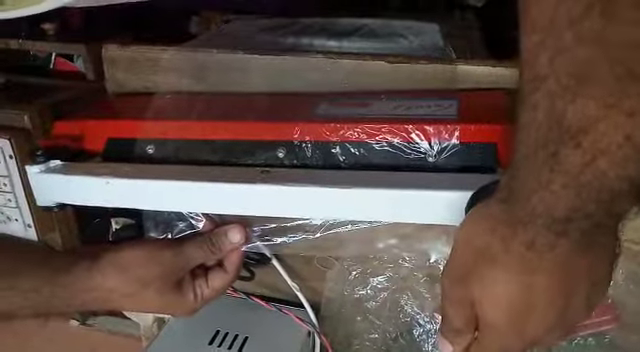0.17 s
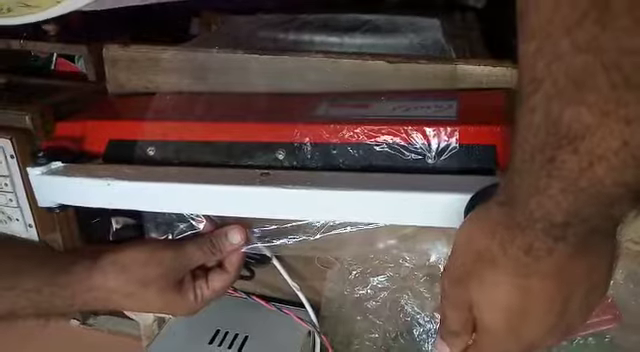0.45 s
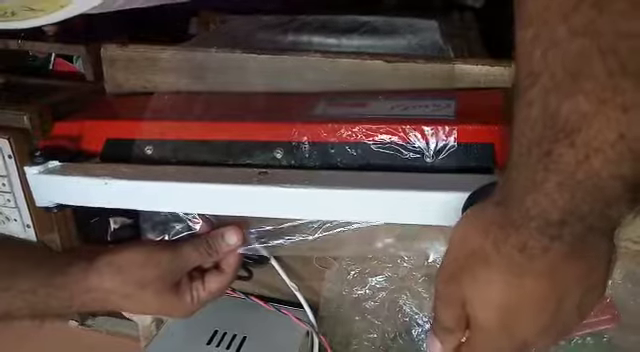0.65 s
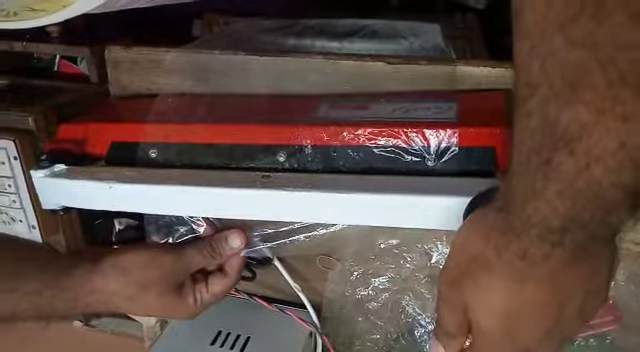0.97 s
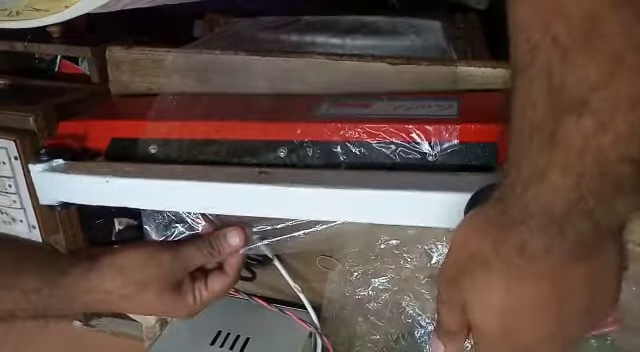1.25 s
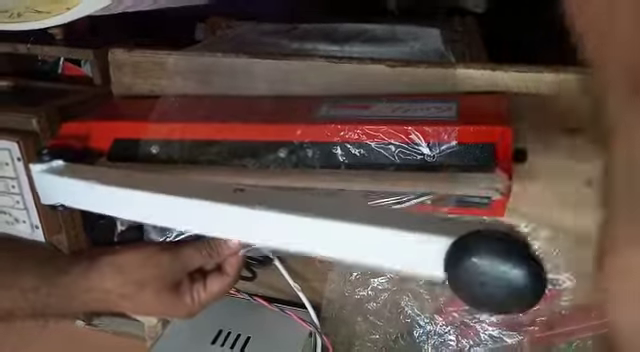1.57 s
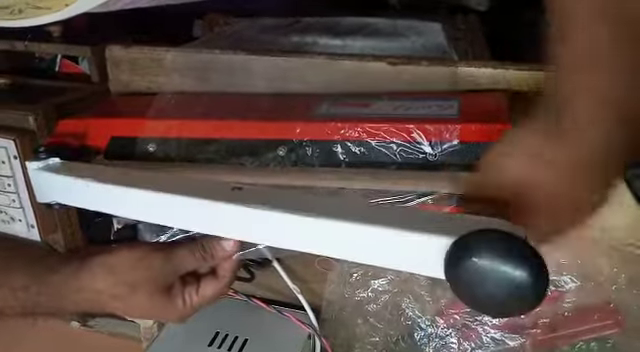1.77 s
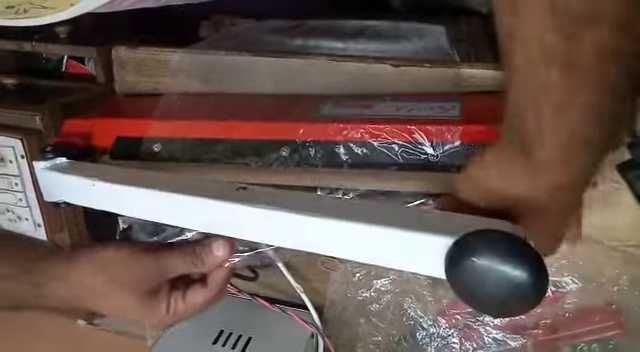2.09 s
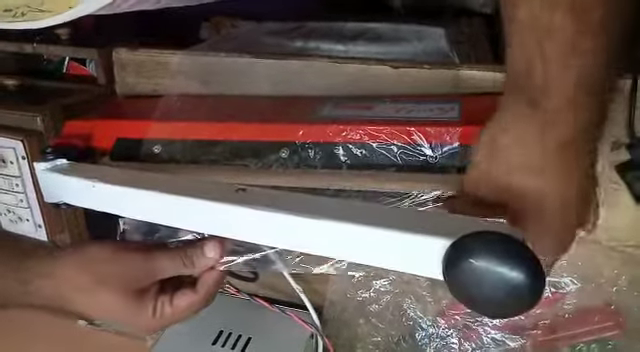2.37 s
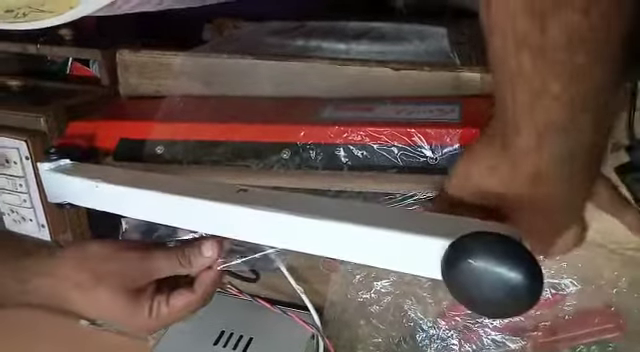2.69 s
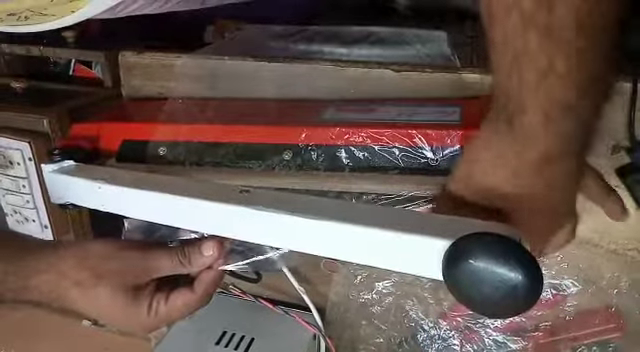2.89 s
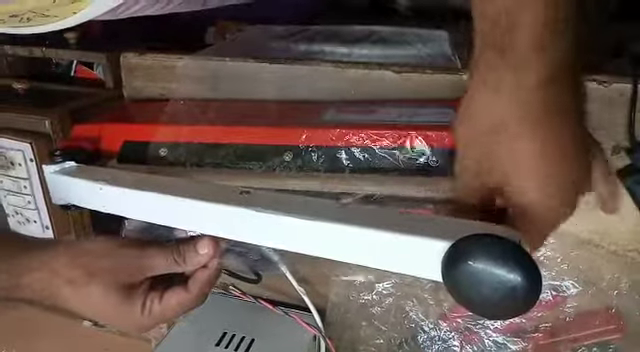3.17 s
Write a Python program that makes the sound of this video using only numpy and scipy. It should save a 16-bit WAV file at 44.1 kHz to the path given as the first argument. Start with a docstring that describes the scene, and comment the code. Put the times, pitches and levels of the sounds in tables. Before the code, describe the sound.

A hand-operated plastic sealer clacks down at about 0.1 seconds with a soft bench thud. Its hinge ticks at 1 second, a bright ringing click follows at 1.3, and the arm rattles against its stop around 1.5 with a short spring twang. Plastic film then crackles faintly, with a light tap at 2.9 and more rustling and soft thuds near 3.2. A fan hums steadily throughout in the small room.

```python
"""Impulse sealer on a workbench

A small room, one small microphone above a cramped bench; a motor, probably a fan, hums throughout.
The hand lever clacks down on plastic film and is held. The grip eases, the hinge slips, the switch
snaps open, and the arm springs up and rattles against its stop, shaking its spring. The film is drawn
away, crackling and rustling, with a tap of the hand on the machine and soft thuds from the bench."""
import sys
import numpy as np
from scipy import signal
from scipy.fft import rfft, irfft, next_fast_len
from scipy.io import wavfile
from scipy.ndimage import map_coordinates

SR = 44100
rng = np.random.default_rng(int(sys.argv[2]) if len(sys.argv) > 2 else 0)


def dump(signal):
    """Clip the signal to [-1, 1] and save it as 16-bit WAV at the path in sys.argv[1]."""
    limited = np.clip(np.atleast_2d(signal).T, -1, 1)
    pcm = np.round(limited * 32767).astype(np.int16)
    wavfile.write(sys.argv[1], SR, pcm)


N = 147294

# blows on each part of the sealer
# (time [s], level [dB], contact length [s], tilt [dB/octave], ringing [dB], favoured pitch [Hz])
LEVER_BLOWS = [(.058, -43, .009, -2, -6, 1800), (.1142, -27, .008, 0, 1, 1100),
               (.2368, -37.5, 0.0036, 1, -1.5, 2580), (.288, -43, 0.0094, -3.5, -0.5, 2590)]
HINGE_BLOWS = [(1.0262, -28.5, 0.0089, -1.5, 4, 1700)]
SWITCH_BLOWS = [(1.3098, -24, 0.012, -2.5, 6, 2600)]
ARM_BLOWS = [(1.5188, -24.5, 0.011, -4, 3, 2000), (1.5875, -36.5, 0.0087, -2, 3, 3400),
             (1.637, -33, 0.0073, -3, 6.5, 2200)]
# resonances of the struck parts (frequency [Hz], level [dB], t60 [s])
BASE_MODES = [(498, 2, 0.12), (955, -9, 0.23), (1242, -7, .2), (1384, -8, .22), (1631, -8, 0.14),
              (1876, -4, 0.23), (2580, -0.5, 0.12), (3910, -6.5, 0.12), (4150, -12, 0.13), (6250, -6, .14)]
HINGE_MODES = [(697, -3, .06), (1596, -1, 0.06), (1826, -5, .05), (2200, -2, 0.051), (6700, -10, .03)]
SWITCH_MODES = [(529, 1.5, 0.22), (823, -15, .2), (1085, -11.5, 0.32), (1580, -12, .14), (1860, -16, .12),
                (2625, -8.5, 0.073), (4180, -13, .08), (4650, -0.5, 0.048), (6170, -5, 0.068),
                (7800, -1, 0.076)]
ARM_MODES = [(450, 0, .17), (531, 1, 0.082), (633, -0.5, 0.21), (1835, -8, 0.11), (2098, 1.5, 0.068),
             (2195, -1, 0.066), (3040, -7, 0.045), (3320, -19, 0.15), (3815, -9, .04), (4200, -9, .04),
             (6630, -24, 0.14)]
# spectra of rushing air and of contact noises (frequency [Hz], level [dB])
AIR_SPECTRUM = [(15, -62), (28, -41.5), (42, -4), (64, -4.5), (92, -1), (120, -1.5), (183, 3), (215, 0),
                (285, 7.5), (345, 9), (440, 0.5), (780, -1), (1000, 0.5), (1220, -2), (1480, -0.5),
                (1800, -5.5), (2150, -4), (3000, -11), (3800, -15.5), (4500, -25.5), (5400, -18.5),
                (7000, -22.5), (10000, -26), (15000, -31.5)]
BASE_CRACK = [(60, -12), (450, 1.5), (750, -6), (1400, 3), (2400, 0), (3300, -17.5), (4100, -9),
              (5200, -20), (6400, -9), (8000, -15.5), (9500, -19), (15000, -26)]
FILM_RUSTLE = [(500, -12.5), (2500, -0.5), (4200, -4), (7000, 1), (10000, -7.5), (15000, -7)]
FILM_CRACK = [(150, -14), (700, -4.5), (1150, -8.5), (1650, 0), (2800, -8), (4500, -12.5), (7000, -11),
              (10000, -12.5), (15000, -23)]
SWITCH_CRACK = [(60, -38), (300, -13.5), (520, -1.5), (900, -8), (1700, -1), (3300, -4.5), (4500, -1),
                (6500, -3.5), (10000, -2.5), (15000, -1)]
ARM_CRACK = [(60, -39), (300, -16), (520, 0), (850, -10), (1500, -5.5), (2100, 1.5), (2600, -5),
             (3400, -1.5), (3850, -9.5), (4400, -10), (6500, -6), (10000, -6), (15000, -14)]
TAP_CRACK = [(500, -10), (2500, -7), (4000, -4.5), (7000, -4), (10000, -23), (15000, -29)]
# tones of the motor (frequency [Hz], level [dB])
MOTOR_TONES = [(96.5, -57.5), (400.1, -41), (1821, -65.5), (4096, -74), (4696, -78.5)]
# bumps of the bench under the hands (time [s], level [dB])
BENCH_BUMPS = [(.082, -31.5), (1.044, -32), (3.069, -39), (3.22, -40)]
# bell-shaped swells of the sliding film (peak time [s], level [dB], half width [s])
FILM_SLIDES = [(0.277, -54, 0.033), (.44, -55.5, 0.055), (0.861, -51, 0.05), (1.094, -56, .06),
               (1.798, -52, 0.042), (2.03, -54, .05), (3.185, -43.5, .028), (3.298, -54.5, 0.088)]
# crackles of the film (time [s], level [dB], length [s], tilt [dB/octave])
FILM_CRACKLES = [(1.0173, -39.5, 0.017, 3), (1.033, -39, .004, 3), (1.0665, -37.5, 0.0046, 0),
                 (1.0834, -42.5, 0.006, 5.5), (1.244, -41.5, 0.0033, 1.5), (2.014, -52, 0.0046, 4),
                 (2.136, -52, .003, 3), (2.335, -51, 0.0028, 4.5), (2.486, -49, 0.0044, 2),
                 (2.895, -46.5, 0.0044, 7), (3.167, -39.5, .014, -3.5), (3.218, -41.5, .006, 2)]
# decay of the small room (frequency [Hz], t60 [s])
ROOM_DECAY = [(500, 0.86), (2500, .28), (7000, 0.24), (14000, .12)]
# response of the microphone (frequency [Hz], gain [dB])
MIC_RESPONSE = [(3500, 1), (4400, -0.5), (4800, -7), (5400, -20), (6300, -13.5), (7600, -16), (9300, -24.5),
                (12000, -25), (13700, -16), (15500, -21)]

EVENT_TIME = np.arange(SR // 2) / SR  # time axis of one short sound [s]


def amp(db):
    """Decibels to gain."""
    return 10 ** (np.asarray(db) / 20)


def along(points, hz):
    """Read a curve of (frequency [Hz], value) points on a log frequency axis."""
    freqs, values = np.transpose(points)
    return np.interp(np.log(hz + 1), np.log(freqs), values)


def wobble(rate):
    """A smooth random curve, rate knots a second."""
    knots = rng.standard_normal(int(N * rate / SR) + 4)
    return map_coordinates(knots, [np.arange(N) * rate / SR])


def noise(spectrum, size, grain_db=0, tilt_db=0):
    """Coloured noise of rms 1; grain_db scatters it into tiny separate impacts."""
    white, grains = rng.standard_normal((2, size))
    hz = np.fft.rfftfreq(size, 1 / SR)
    gain = amp(along(spectrum, hz) + tilt_db * np.log2(hz + 1))
    coloured = irfft(rfft(white * amp(grain_db * grains)) * gain, size)
    return coloured / np.sqrt(np.mean(coloured ** 2) + 1e-20)


def add(track, start_s, sound):
    """Mix a sound into the track at start_s."""
    part = track[round(start_s * SR):][:len(sound)]
    part += sound[:len(part)]


def contact(spectrum, length, rise_s, t60, room_db, tilt_db=0):
    """A short chatter of tiny impacts, then the room's answer, whose treble dies first."""
    t = EVENT_TIME
    progress = np.minimum(t / length, 1)
    since_end = np.maximum(t - length, 0)
    chatter = noise(spectrum, len(t), grain_db=4.5, tilt_db=tilt_db)
    chatter *= (1 - np.exp(-t / rise_s)) * amp(-60 * since_end / t60)
    chatter *= amp(5.5 * (0.5 - progress))  # the impacts weaken over the contact
    hz, frame_s, bands = signal.stft(noise(spectrum, len(t), tilt_db=tilt_db), SR, nperseg=256)
    decay = amp(room_db - 60 * frame_s / along(ROOM_DECAY, hz)[:, None])
    _, room = signal.istft(bands * decay, SR, nperseg=256)
    return chatter + room[:len(t)] * progress


def knocks(blows, modes, crack, crack_db, rise_s, t60, room_db):
    """Each blow cracks and builds up the part's ringing, favouring the modes near one pitch."""
    out, t = np.zeros(N), EVENT_TIME
    for start_s, db, length, tilt_db, ring_db, favoured_hz in blows:
        ring = 0
        for hz, mode_db, mode_t60 in modes:
            scatter, phase = rng.standard_normal(2)
            octaves_away = abs(np.log2(hz / favoured_hz))
            level_db = ring_db + mode_db + 0.31 * scatter - 6 * octaves_away
            ring += amp(level_db - 60 * t / mode_t60) * np.sin(2 * np.pi * hz * t + np.pi * phase)
        ring *= 1 - np.exp(-(t / (0.5 * length)) ** 2)
        chatter = amp(crack_db) * contact(crack, length, rise_s, t60, room_db, tilt_db)
        add(out, start_s, amp(db) * (ring + chatter))
    return out


def fan():
    """The room tone: steady motor tones over rushing air."""
    hum, t = np.zeros(N), np.arange(N) / SR
    for hz, db in MOTOR_TONES:
        peak = np.sqrt(2) * amp(db + 0.1 * wobble(8))
        phase_drift = hz / 8000 * wobble(7.5)
        hum += peak * np.sin(2 * np.pi * hz * t + phase_drift)
    air = amp(-39 + 0.49 * wobble(14)) * noise(AIR_SPECTRUM, N)
    return hum + air


def lever_press():
    """The lever clacks home and sets the base ringing."""
    return knocks(LEVER_BLOWS, BASE_MODES, BASE_CRACK,
                  crack_db=-2.5, rise_s=0.0026, t60=0.12, room_db=-1.5)


def bench_thuds(hz=86.5, rise_s=0.018, t60=0.24):
    """Below the microphone, the bench gives a low thud when the weight on it shifts."""
    out, t = np.zeros(N), EVENT_TIME
    envelope = (1 - np.exp(-(t / rise_s) ** 2)) * amp(-60 * t / t60)
    for start_s, db in BENCH_BUMPS:
        add(out, start_s, amp(db) * envelope * np.sin(2 * np.pi * hz * t))
    return out


def film(crinkles_per_s=11):
    """Thin plastic crackles and rustles as it is pulled, with faint crinkles throughout."""
    out, t = np.zeros(N), np.arange(N) / SR
    for start_s, db, length, tilt_db in FILM_CRACKLES:
        crackle = contact(FILM_CRACK, length, rise_s=0.0015, t60=0.044, room_db=-4.5, tilt_db=tilt_db)
        add(out, start_s, amp(db) * crackle)
    for start_s in rng.uniform(0, N / SR, int(crinkles_per_s * N / SR)):
        db = rng.normal(-65, 3)
        crinkle = contact(FILM_RUSTLE, length=0.0035, rise_s=0.001, t60=0.02, room_db=-16.5)
        add(out, start_s, amp(db) * crinkle)
    pull = sum(amp(db) * np.exp(-0.5 * ((t - peak_s) / half_width) ** 2)
               for peak_s, db, half_width in FILM_SLIDES)
    flicker = amp(1.7 * wobble(70))
    return out + pull * flicker * noise(FILM_RUSTLE, N, grain_db=11.5)


def hinge_slip():
    """The hinge slips as the grip eases: a dry tick, its crack coloured like the film's."""
    return knocks(HINGE_BLOWS, HINGE_MODES, FILM_CRACK,
                  crack_db=-4, rise_s=0.0018, t60=0.015, room_db=-26)


def switch_snap():
    """The switch snaps open with one bright, ringing click."""
    return knocks(SWITCH_BLOWS, SWITCH_MODES, SWITCH_CRACK,
                  crack_db=-4, rise_s=0.0006, t60=0.019, room_db=-4)


def arm_rebound():
    """The rising arm hits its stop and bounces twice."""
    return knocks(ARM_BLOWS, ARM_MODES, ARM_CRACK, crack_db=0, rise_s=0.002, t60=0.021, room_db=-8)


def spring_twang(start_s=1.598, hz=448, db=-26, rise_s=0.0016, t60=0.14):
    """The return spring, shaken by the bounce, rings on one note."""
    out, t = np.zeros(N), EVENT_TIME
    envelope = (1 - np.exp(-t / rise_s)) * amp(db - 60 * t / t60)
    add(out, start_s, envelope * np.sin(2 * np.pi * hz * t))
    return out


def hand_tap(start_s=2.9245, db=-42.5):
    """A hand taps the machine, too lightly to make it ring."""
    out = np.zeros(N)
    add(out, start_s, amp(db) * contact(TAP_CRACK, length=0.007, rise_s=0.00089, t60=0.013, room_db=-16))
    return out


def scene():
    """Sealer, film, bench and fan, heard in mono from above the bench."""
    sealer = lever_press() + switch_snap() + arm_rebound() + hinge_slip() + spring_twang()
    return (sealer + hand_tap() + film() + bench_thuds() + fan())[None]


def record(dry, low_cut_hz=35, top_hz=15700):
    """A small microphone with no deep bass, a dull, uneven treble and a steep band limit."""
    size = 2 * next_fast_len(N)
    hz = np.fft.rfftfreq(size, 1 / SR)
    # folding the cepstrum makes the microphone's response minimum-phase
    cepstrum = irfft(np.log(amp(along(MIC_RESPONSE, hz))), size)
    cepstrum[1:size // 2] *= 2
    cepstrum[size // 2 + 1:] = 0
    response = np.exp(rfft(cepstrum)) * (hz < top_hz)
    low_cut = signal.butter(4, low_cut_hz, 'high', fs=SR, output='sos')
    return irfft(rfft(signal.sosfilt(low_cut, dry), size) * response, size)[:, :N]


dry = scene()
out = record(dry)
dump(out)
```